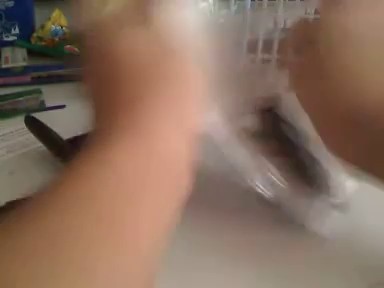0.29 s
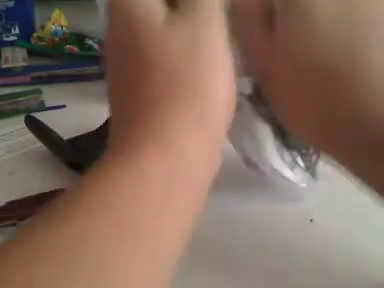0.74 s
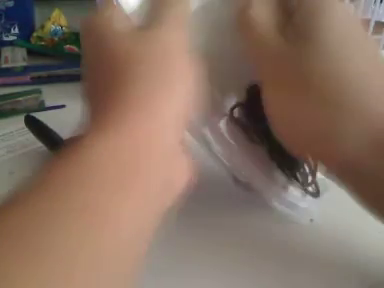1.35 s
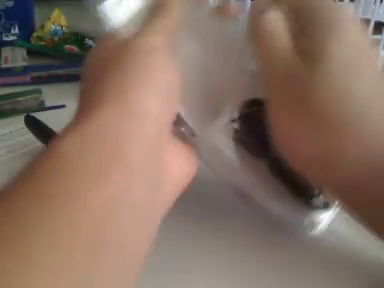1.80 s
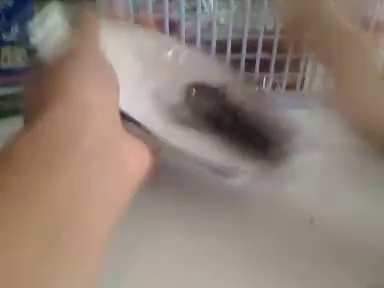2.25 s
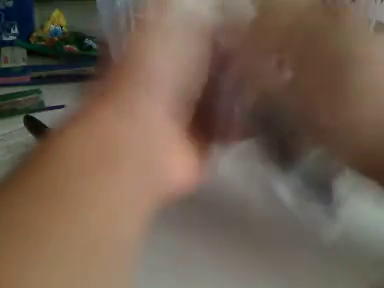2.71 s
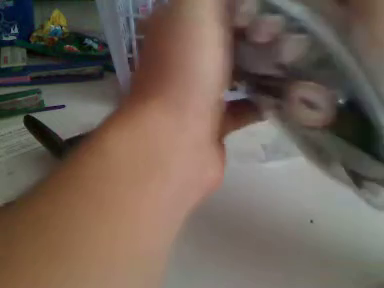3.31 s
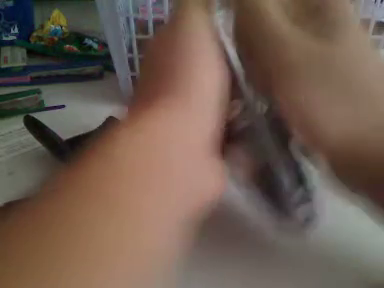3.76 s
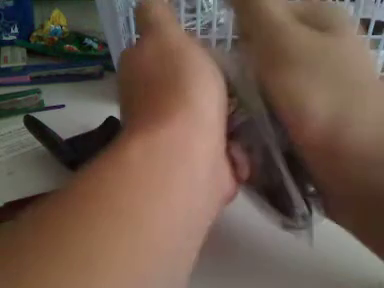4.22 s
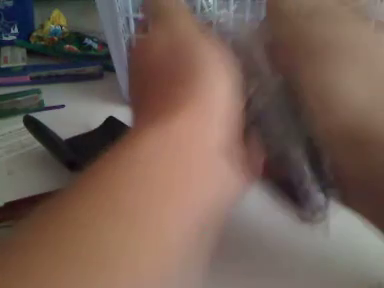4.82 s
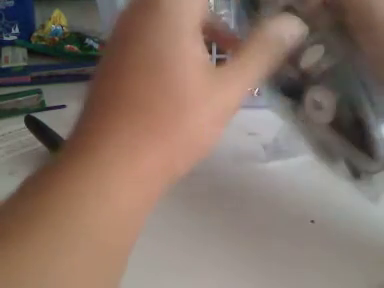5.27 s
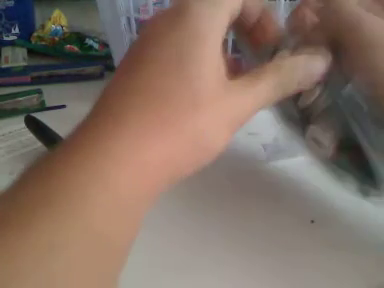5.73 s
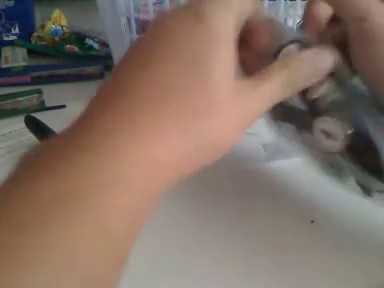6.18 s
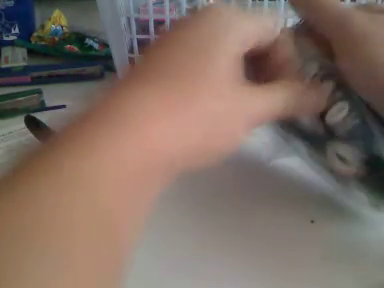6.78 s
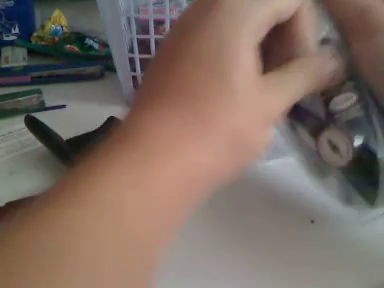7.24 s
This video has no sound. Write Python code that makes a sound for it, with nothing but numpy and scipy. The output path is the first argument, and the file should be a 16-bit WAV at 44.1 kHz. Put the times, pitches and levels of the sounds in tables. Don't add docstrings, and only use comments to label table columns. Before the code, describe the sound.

Stiff clear plastic packaging buckles, crackles and snaps in hands close to a dull microphone, with two booming cracks among many small dry pops.

```python
import sys
import numpy as np
from scipy import signal
from scipy.fft import rfft, irfft
from scipy.io import wavfile

SR = 44100
rng = np.random.default_rng(int(sys.argv[2]) if len(sys.argv) > 2 else 0)


def boost_factor(decibels):
    exponent = np.asarray(decibels, float) / 20
    return 10 ** exponent


def generate_wav(signal):
    frames = np.transpose(np.atleast_2d(signal))
    scaled = np.clip(frames, -1, 1) * 32767
    pcm = np.round(scaled).astype(np.int16)
    wavfile.write(sys.argv[1], SR, pcm)


N = 326369

# (time [s], peak [dB],
# panel pitch [Hz], crack over panel [dB], shudder over panel [dB])
HOLLOW_SNAPS = [(0.202, -31.5, 910, -13, -28), (0.2797, -11, 934, -4.5, -15), (0.561, -16, 1050, -6, -15),
                (0.822, -17.5, 865, 3, -26.5), (1.0931, -24, 2500, 3, -37), (1.74, -19, 830, -11.5, -23.5),
                (2.757, -27.5, 970, -1.5, -16.5), (2.868, -27, 817, 0.5, -23),
                (2.929, -25, 830, -0.5, -24.5), (3.028, -34, 868, -6.5, -14.5), (4.234, -29, 980, -3, -24)]
SHELL_SNAPS = [(1.798, -22.5, 1175, -0.5, -15), (2.269, -10.5, 715, -7.5, -5), (3.391, -31, 817, -0.5, -24),
               (3.983, -28, 815, -6, -10.5), (4.526, -25, 556, -1.5, -16.5), (4.643, -19.5, 559, 0.5, -16),
               (5.175, -31, 1010, 1, -17), (5.229, -24.5, 532, -28, -9), (5.644, -29.5, 795, -8, -19),
               (6.055, -24, 665, -4, -30), (6.336, -26.5, 860, -17, -12), (6.427, -31.5, 632, -7, -10),
               (6.737, -23.5, 780, -4, -17), (6.81, -28, 392, -4.5, -13), (7.097, -12.5, 617, -1.5, -6.5),
               (7.32, -18, 785, -13.5, -40)]
# (time [s], peak [dB], panel pitch [Hz], shudder over panel [dB])
NEIGHBOURS = [(.277, -22.5, 800, -14), (.279, -22, 1030, -5.5), (0.564, -22, 1000, -10.5),
              (1.739, -28.5, 510, -6), (1.799, -27.5, 1728, -12.5), (2.27, -17.5, 1200, -1.5),
              (2.2684, -17.5, 3630, -25), (4.5258, -33, 1680, -15), (4.526, -39, 996, -21),
              (5.229, -33, 1080, -12), (5.229, -22.5, 1805, -7), (5.231, -35, 2330, -13),
              (5.301, -52, 1500, -20), (7.098, -17, 1630, -10), (6.335, -30, 510, -13),
              (6.739, -43.5, 2280, -5.5), (7.096, -19, 1740, -6), (7.096, -18, 930, -21),
              (7.32, -39, 2234, -21)]
# (time [s], modes [(pitch [Hz], level [dB], fall by 60 dB [s])])
FLIPS = [(.2778, [(419, -20.5, 0.042), (827, -3, 0.012), (1034, -3, 0.012), (1450, -18, 0.025),
         (2670, -25.5, 0.008), (3600, -28, 0.019)]), (.561, [(443, -17.5, 0.031), (1107, -33, 0.018),
         (3330, -19.5, 0.007)]), (1.74, [(395, -14.5, 0.0088), (826, -18.5, 0.039), (1500, -23.5, 0.019)]),
         (1.798, [(1130, -9.5, 0.025), (1600, -9.5, 0.016), (1990, -37, 0.016), (3270, -12.5, 0.0059)]),
         (2.269, [(203, -10, 0.024), (482, -9, 0.017), (727.5, 5, 0.02), (1172, -16, 0.089),
         (1468, -2.5, 0.023), (1803, -12.5, 0.048), (2164, -11.5, .02), (2980, -7.5, 0.017),
         (3405, -8, 0.014)]), (4.526, [(594, -24.5, .025), (999, -20.5, 0.012), (1476, -24, 0.014),
         (2395, -25, 0.0094)]), (4.642, [(510, -29, 0.038), (1500, -36.5, 0.014), (2500, -25.5, 0.01)]),
         (5.228, [(536, -12.5, 0.019), (1070, -16.5, 0.018), (1656, -21.5, 0.021), (1850, -22.5, 0.018),
         (2530, -29.5, 0.011), (3753, -28.5, 0.0095)]), (6.335, [(523, -33.5, 0.042), (879, -23.5, 0.04),
         (2160, -32.5, 0.017)]), (6.738, [(765, -22.5, 0.012), (1500, -31, 0.0045), (2400, -20, 0.0072)]),
         (6.8097, [(476, -18, 0.013), (1610, -24.5, 0.013), (3430, -40.5, .012)]),
         (7.0964, [(200, -17, 0.03), (640, -2.5, 0.027), (867, 1.5, 0.013), (1682, -10.5, 0.034),
         (2098, -3.5, 0.011), (3100, -13.5, 0.028), (3623, -3.5, 0.0097)]), (7.32, [(803, -19, 0.024),
         (1020, -18.5, 0.015), (1440, -27.5, 0.027), (1710, -28, 0.022), (2430, -24.5, 0.017),
         (3460, -21, 0.014)])]
# (time [s], peak [dB], panel pitch [Hz], crack over
# panel [dB])
HOLLOW_TICKS = [(0.031, -38.5, 810, -1), (0.135, -49, 468, 2), (6.801, -37.5, 850, -12),
                (0.388, -34, 500, -6), (0.443, -35.5, 820, -11), (0.465, -36.5, 800, -9),
                (0.609, -30.5, 870, -10.5), (0.73, -35, 790, -6.5), (0.779, -43.5, 870, -24),
                (0.879, -39, 860, -30), (0.915, -26, 870, -3.5), (1.053, -37.5, 860, -5),
                (1.154, -36, 1240, -19), (1.237, -35, 785, -7.5), (1.0897, -33, 1000, -8),
                (1.508, -36, 317, -33), (1.572, -36.5, 790, -41.5), (1.674, -34, 740, -34),
                (1.913, -34.5, 790, -35.5), (1.985, -44.5, 1190, -41), (2.057, -34, 810, -66),
                (2.089, -37, 460, -45), (2.515, -37, 890, -19)]
SHELL_TICKS = [(2.729, -39.5, 966, 12.5), (2.803, -32.5, 1210, -8), (2.959, -42.5, 816, -5),
               (3.049, -33.5, 830, -29), (3.249, -37, 1270, -7), (3.286, -36.5, 404, -9),
               (3.347, -37, 855, -13), (3.45, -32.5, 1560, -1), (3.479, -31.5, 877, -5),
               (3.577, -38, 490, -7.5), (3.694, -38, 516, -10), (3.762, -39, 864, -38.5),
               (4.38, -35, 603, -2.5), (4.486, -30, 470, -5), (4.898, -38.5, 1540, -6),
               (5.106, -38.5, 493, -2), (5.565, -31.5, 610, -18.5), (5.609, -30, 820, -3),
               (5.75, -37, 570, -8), (5.789, -33.5, 593, -14), (5.844, -27.5, 1660, -5),
               (5.962, -29.5, 613, -21), (5.996, -36.5, 659, 0.5), (6.1, -30, 600, -36),
               (6.169, -38.5, 855, -27), (6.485, -36, 666, -24), (6.52, -35, 1580, -26),
               (3.658, -49.5, 1500, -13), (6.997, -33.5, 895, -8), (7.027, -32.5, 493, -7.5)]
CREASES = [(0.046, -46.5, 730, -9), (.066, -41.5, 1220, -27.5), (0.154, -54, 447, -1),
           (.215, -41, 1073, -15.5), (0.652, -44, 781, -7), (.988, -40, 880, -1), (1.02, -44, 1030, -38),
           (1.115, -35, 1320, -32), (1.213, -39, 1540, -21), (1.654, -38, 796, -34),
           (2.075, -39, 760, -59.5), (2.114, -46, 700, -65.5), (2.744, -34, 850, -9.5),
           (2.829, -33.5, 1500, 9.5), (3.519, -45, 510, -21), (3.606, -40, 594, -34), (3.845, -39, 760, 7),
           (3.93, -38.5, 866, -17), (4.003, -32, 1060, -13), (4.045, -36.5, 1083, -37),
           (4.211, -35, 760, -11), (4.254, -35, 1070, -4.5), (4.768, -44, 1410, -8),
           (4.964, -48, 475, -20.5), (5.316, -34.5, 860, -15), (5.416, -36, 1010, -6),
           (5.469, -39, 867, -26), (5.664, -34.5, 550, -29), (5.814, -35, 624, -31),
           (6.378, -48, 520, -12.5)]
MORE_CREASES = [(.774, -45, 859, -4), (1.176, -40.5, 1260, -19), (1.598, -41, 817, -34), (1.638, -40, 650, -26),
                (1.701, -41, 724, -15), (1.732, -34.5, 790, -27), (1.967, -49, 1200, -25),
                (2.028, -37.5, 830, -34), (2.105, -64, 780, -31), (2.244, -44.5, 1396, -13.5),
                (2.984, -46.5, 852, -12.5), (3.299, -50, 506, -11), (3.314, -41, 1210, 9.5),
                (3.354, -34.5, 484, -4), (3.414, -39.5, 796, -15), (3.827, -44, 2220, -12.5),
                (3.857, -40, 874, -8), (3.914, -43, 2070, -4), (3.973, -36, 880, -22.5), (4.089, -44, 478, -3),
                (4.497, -41, 450, -8.5), (4.579, -43, 562, -22), (4.714, -38.5, 516, -19),
                (3.497, -42, 500, -11), (4.784, -45, 680, -3), (4.797, -45.5, 1460, -14),
                (4.814, -43.5, 1500, -2.5), (4.851, -45.5, 2300, -5), (2.449, -39.5, 340, -19),
                (4.916, -41.5, 1630, -9.5), (5.119, -40.5, 546, -7), (5.14, -45, 2400, 2),
                (5.167, -34.5, 550, -5.5), (5.199, -33.5, 511, -3), (5.269, -41, 1780, -18),
                (5.279, -39, 570, -21), (5.308, -35.5, 2030, -2.5), (5.434, -39.5, 750, -9),
                (5.482, -40.5, 800, -14), (5.837, -36, 1600, -7), (5.974, -35, 663, -13), (6.135, -37, 865, -1),
                (6.348, -36.5, 894, -12), (6.392, -37.5, 659, -13), (6.727, -35.5, 746, -14.5),
                (6.764, -36.5, 800, -6), (6.794, -32.5, 855, -10), (6.949, -40, 646, -8)]
# (time [s], length [s], level [dB], panel pitch [Hz], crack over panel [dB])
FOLDS = [(0.243, 0.02, -28, 426, -35), (0.529, 0.059, -30, 800, -39), (0.811, 0.016, -31, 1000, -5),
         (0.858, 0.075, -30.5, 1050, -7), (1.094, 0.043, -33.5, 1080, -10), (1.45, 0.18, -40, 330, -45.5),
         (1.992, 0.023, -36, 965, -46), (2.738, 0.1, -43, 950, 0), (2.884, 0.025, -41, 3560, -1),
         (2.927, 0.048, -49, 900, 11), (3.913, 0.043, -40, 670, -8), (3.937, 0.081, -42.5, 784, -24),
         (4.179, 0.064, -47, 980, -1), (5.223, 0.095, -40.5, 1580, -6), (5.717, 0.18, -41, 550, -11),
         (5.924, 0.074, -48.5, 745, 8.5), (6.051, 0.015, -23.5, 930, -5), (6.067, 0.072, -33, 584, -3),
         (6.465, 0.041, -37.5, 870, -0.5), (6.785, 0.064, -39.5, 614, -32.5),
         (7.337, 0.032, -51.5, 470, -18.5)]
SHIFTS = [
    (0, 0.028, -57.5, 885, 12),
    (1.33, 0.078, -41, 208, -39),
    (1.892, 0.19, -39, 700, -46),
    (2.358, 0.18, -45, 700, -6.5),
    (2.502, 0.051, -51.5, 1300, 2.5),
    (3.108, 0.16, -47, 780, -3),
    (4.714, 0.12, -50.5, 538, 4),
    (6.855, 0.24, -44.5, 700, -1.5),
]
FURTHER_RUNS = [(0.753, 0.053, -40, 840, -5), (1.146, 0.047, -39.5, 1200, -6), (1.219, 0.061, -44, 448, -11),
                (1.467, 0.083, -37.5, 820, -35), (1.557, 0.23, -43.5, 780, -19), (1.796, 0.067, -36, 1170, -31),
                (1.828, 0.11, -49.5, 1670, -16), (1.914, 0.031, -40, 940, -26), (1.936, 0.089, -42, 326, -37),
                (2.866, 0.025, -32, 3600, -7.5), (3.276, 0.038, -36.5, 780, -7), (3.34, 0.043, -46, 800, 1),
                (3.833, 0.16, -43.5, 530, -15), (4.085, 0.026, -48.5, 504, -2.5),
                (4.529, 0.076, -46, 1690, -22.5), (4.966, 0.029, -53.5, 700, 6), (5.168, 0.061, -38, 617, -2.5),
                (5.389, 0.058, -42.5, 945, -18), (5.433, 0.069, -38.5, 773, -9), (5.492, 0.07, -40.5, 726, -6),
                (5.559, 0.026, -36, 646, -12), (5.633, 0.031, -27.5, 820, -6), (5.937, 0.055, -40, 650, -21),
                (6.027, .025, -38, 800, -8), (6.131, 0.059, -44.5, 800, -3.5), (6.301, 0.034, -42, 796, -17),
                (6.344, 0.16, -47, 870, -10), (6.741, 0.027, -41.5, 810, -3), (6.845, 0.033, -37, 700, -0.5),
                (7.16, 0.17, -41, 510, -5.5), (7.312, 0.071, -35.5, 490, -2), (7.379, 0.027, -40.5, 420, -17)]
# (time [s], pitch [Hz], level [dB], fall by 60 dB [s])
SHELL_RINGS = [
    (.279, 797, -29, 0.044),
    (1.8, 1200, -49, 0.096),
    (1.8, 1548, -43, 0.086),
    (2.272, 710, -27.5, .27),
    (2.272, 762.5, -34.5, 0.31),
    (7.1, 702, -32.5, 0.18),
    (7.1, 561, -31.5, 0.23),
]
# (time [s], squeeze [dB], tautness as sheet over body [dB])
CRUMPLE = [
    (0.0, -64, 2),
    (1.96, -60, 3),
    (2.06, -63, 2),
    (6.86, -60.5, 1.5),
    (7.4, -53.5, -1.5),
]
# (pitch [Hz], width [Hz], level [dB])
BODY = [(468, 40, 6.5), (640, 29, -1), (820, 77, 3), (1050, 170, -3.5)]
# (frequency [Hz], level [dB])
SHEET = [(710, -39.5), (1200, -24), (1300, 7), (2010, 1.5), (2160, -0.5), (3600, 0), (4400, -9),
         (5720, -56.5), (9680, -120)]
# (pitch [Hz], width [Hz], level [dB])
RIDGES = [(1545, 170, 1), (2500, 320, -15), (3170, 530, -17.5)]
# (frequency [Hz], fall by 60 dB [s])
SHUDDER = [(300, 0.052), (700, 0.22), (1500, 0.054), (4000, 0.38)]
# (time [s], peak [dB])
THUDS = [(0.561, -40.5), (0.819, -43.5), (1.797, -45), (2.268, -24.5), (2.778, -49), (2.865, -48),
         (3.985, -48.5), (4.639, -48.5), (5.224, -49.5), (5.799, -57), (6.44, -51.5), (6.81, -42.5),
         (7.094, -31.5), (7.317, -46.5)]
# (time [s], level [dB])
LEAN = [
    (0.0, -69.5),
    (.9, -69),
    (1.3, -70.5),
    (2.2, -72.5),
    (2.4, -64),
    (2.95, -66.5),
    (3.15, -72),
    (6.2, -71),
    (6.82, -69.5),
    (7.4, -67),
]
# (frequency [Hz], fall by 60 dB [s], level [dB])
ROOM = [(100, 0.29, -15.5), (291.6, 0.19, -18.5), (700, 0.24, -20), (1500, 0.36, -23.5), (2500, .14, -16.5),
        (4180, 0.097, -18)]
# (frequency [Hz], level [dB])
HUSH = [(12, -33.5), (20, 7.5), (49, 11.5), (195, -15.5), (471, -4), (828, -10), (1190, -5), (3510, -12.5),
        (4020, -21), (4400, -6), (5720, -42), (9680, -120)]

HOLLOW_BOOM_DB, SHELL_BOOM_DB = -7, -20.5
SNAP_WIDTH_HZ = 115
FLIP_RISE_CYCLES = 0.89
BODY_DB, SHEET_DB = -4.5, -11.5
RUB_DB, RUB_FOLLOWS = -65, 0.29
SHEET_FOLLOWS_CRACK = 0.28
SETTLE_S, LEAD_S = 0.031, 0.0093
SETTLE_FOLLOWS, TYPICAL_DB = 0.22, -33
REST_DB = -2
RUMBLE_DB, RUMBLE_SWAY_DB = 1.5, 1
ECHO_S, ECHO_DB = 0.0102, -18
BAND_EDGE_HZ, OVERLOAD = 4886, 0.72


def snaps():
    rows = []
    for table, boom_db in ((HOLLOW_SNAPS, HOLLOW_BOOM_DB), (SHELL_SNAPS, SHELL_BOOM_DB)):
        rows += [(s, db, hz, crack_db, boom_db, shudder_db) for s, db, hz, crack_db, shudder_db in table]
    rows += [(s, db, hz, -30, -30, shudder_db) for s, db, hz, shudder_db in NEIGHBOURS]
    return buckle(rows, rip_s=0.003, rise_s=0.00041, trim_db=(-1.1, 4, 4), size=10240)


def flips():
    out = np.zeros(N + SR // 10)
    t = np.arange(SR // 10) / SR
    for s, modes in FLIPS:
        hz, db, t60 = np.transpose(modes)[:, :, None]
        rise = np.minimum(t * hz / FLIP_RISE_CYCLES, 1)
        ringing = boost_factor(db - 60 * t / t60) * np.sin(2 * np.pi * hz * t) * rise
        out[round(s * SR):][:len(t)] += np.sum(ringing, axis=0)
    return out[:N]


def ticks():
    pops = HOLLOW_TICKS + SHELL_TICKS + CREASES + MORE_CREASES
    rows = [(s, db, hz, crack_db, -14, -21) for s, db, hz, crack_db in pops]
    return buckle(rows, rip_s=0.002, rise_s=0.0005, trim_db=(-3, 5, 0.1), size=5120)


def buckle(rows, rip_s, rise_s, trim_db, size):
    out = np.zeros(N + size)
    t = np.arange(size) / SR
    s, peak_db, panel_hz, crack_db, boom_db, shudder_db = np.transpose(rows)[:, :, None]
    level_trim, crack_trim, boom_trim = trim_db
    colour = crack_db + crack_trim, boom_db + boom_trim
    white = rng.standard_normal((len(rows), 2, size))
    rip = white[:, 0] * np.exp(-t / rip_s) * np.minimum(t / rise_s, 1)
    crack = peak_one(voice(rip, panel_hz, SNAP_WIDTH_HZ, *colour))

    shudder = voice(white[:, 1], panel_hz, 3.1 * SNAP_WIDTH_HZ, *colour) * np.minimum(t / 0.003, 1)
    treble = band(shudder, 450, 6000)
    dying = (shudder - treble) * boost_factor(-60 * t / at_hz(SHUDDER, panel_hz))
    dying = dying + 0.45 * treble * boost_factor(-60 * t / at_hz(SHUDDER, 2500))
    sounds = boost_factor(peak_db + level_trim) * (crack + boost_factor(shudder_db) * dying)
    starts = np.round(s.ravel() * SR).astype(int) - 30
    for at, sound in zip(starts, sounds):
        out[at:at + size] += sound
    return out[:N]


def voice(rips, panel_hz, width_hz, crack_db, boom_db):
    panel = []
    for rip, hz in zip(rips, np.ravel(panel_hz)):
        modes = resonate(rip, hz, width_hz) + 0.13 * resonate(rip, 1.9 * hz, width_hz)
        panel.append(resonate(modes, hz, 1.5 * hz))
    bright = resonances(rips, RIDGES) + 1.7 * band(rips, 920, 3100)
    boom = band(band(rips, 170, 800), 165, 900)
    return rms_one(np.array(panel)) + boost_factor(crack_db) * rms_one(bright) + boost_factor(boom_db) * rms_one(boom)


def runs():
    out = np.zeros(N + SR)
    cracks = np.r_[grains(per_s=3500, spread_db=3.5, clump_db=2.5), rng.standard_normal(SR)]
    for s, length_s, db, panel_hz, crack_db in FOLDS + SHIFTS + FURTHER_RUNS:
        at, size = round(s * SR), round(length_s * SR)
        swell = np.r_[np.sqrt(np.hanning(size)), np.zeros(size)]
        packed = cracks[None, at:at + 2 * size] * swell
        out[at:at + 2 * size] += boost_factor(db - 18.5) * voice(packed, panel_hz, 210, crack_db, -15.5)[0]
    return out[:N]


def rings():
    out = np.zeros(N + SR // 2)
    t = np.arange(SR // 2) / SR
    for s, hz, db, t60 in SHELL_RINGS:
        at = round(s * SR)
        out[at:at + len(t)] += boost_factor(db - 60 * t / t60) * np.sin(2 * np.pi * hz * t) * np.minimum(t / 0.0099, 1)
    return out[:N]


def crumple():
    effort_db, taut_db = in_time(CRUMPLE)
    sheet_db = effort_db + settling(SHEET_FOLLOWS_CRACK) + SHEET_DB + taut_db
    squeeze_db = effort_db + settling(0)
    rub_db = RUB_DB + RUB_FOLLOWS * (squeeze_db - squeeze_db.mean() - taut_db)
    cracks = grains(per_s=500, spread_db=4.5, clump_db=1.5)
    fine = grains(per_s=2000, spread_db=4, clump_db=1.5)
    body = boost_factor(squeeze_db + BODY_DB - taut_db) * rms_one(resonances(cracks, BODY))
    sheet = boost_factor(sheet_db) * shaped(cracks + fine, SHEET)
    rub = band(rng.standard_normal(N) * boost_factor(2 * drift(25.0)), 80, 530)
    return body + sheet + boost_factor(rub_db) * rms_one(rub)


def settling(crack_share):
    kicks = np.zeros(N + SR)
    t = np.arange(SR) / SR / SETTLE_S
    for s, db, hz, crack_db, *_ in HOLLOW_SNAPS + SHELL_SNAPS + HOLLOW_TICKS + SHELL_TICKS + CREASES:
        kicks[round(s * SR)] = boost_factor(SETTLE_FOLLOWS * (db - TYPICAL_DB) + crack_share * (crack_db + 10.5))
    swells = signal.fftconvolve(kicks, t * np.exp(1 - t))
    busy = np.abs(swells[round(LEAD_S * SR):][:N])
    return 20 * np.log10(boost_factor(REST_DB) + busy)


def rumble():
    knocks = np.zeros(N)
    for s, db in THUDS:
        knocks[round(s * SR)] = boost_factor(db + 44.5)
    thuds = band(band(knocks, 22, 200), 20, 180)
    level_db = RUMBLE_DB + in_time(LEAN)[0] + RUMBLE_SWAY_DB * drift(4.0)
    return boost_factor(level_db) * rms_one(band(rng.standard_normal(N), 25, 100)) + thuds


def room(x):
    t = np.arange(SR // 2) / SR
    edges = 60 * 2 ** np.arange(0, 6.6, 0.5)
    white = rng.standard_normal((2, len(t)))
    reply = np.zeros(len(t))
    for k, (low, high) in enumerate(zip(edges, edges[1:])):
        hz = np.sqrt(low * high)
        dying = white[k % 2] * boost_factor(-60 * t / at_hz(ROOM, hz)) * np.minimum(t / 0.013, 1)
        dying = dying / np.sqrt(np.sum(dying ** 2))
        reply += boost_factor(at_hz(ROOM, hz, axis=2)) * band(dying, low, high)
    reply[round(ECHO_S * SR)] += boost_factor(ECHO_DB)
    return signal.fftconvolve(x, reply)[:N]


def hush():
    return boost_factor(-70) * shaped(rng.standard_normal(N), HUSH)


def grains(per_s, spread_db, clump_db):
    born = rng.random(N) < per_s * boost_factor(clump_db * drift(25.0)) / SR
    size = boost_factor(spread_db * np.minimum(rng.exponential(1, N), 4))
    return born * size * rng.choice([-1, 1], N) + 1e-9


def drift(rate_hz):
    r = np.exp(-2 * np.pi * rate_hz / SR)
    wander = signal.lfilter([1], [1, -2 * r, r * r], rng.standard_normal(N + SR))
    return rms_one(wander[SR:])


def resonate(x, hz, width_hz):
    r = np.exp(-np.pi * width_hz / SR)
    poles = [1, -2 * r * np.cos(2 * np.pi * hz / SR), r * r]
    return signal.lfilter([(1 - r * r) / 2, 0, (r * r - 1) / 2], poles, x)


def resonances(x, modes):
    return sum((-1) ** k * boost_factor(db) * resonate(x, hz, width_hz) for k, (hz, width_hz, db) in enumerate(modes))


def band(x, low_hz, high_hz):
    return signal.sosfilt(signal.butter(2, [low_hz, high_hz], "band", fs=SR, output="sos"), x)


def shaped(x, spectrum):
    gain = boost_factor(at_hz(spectrum, np.linspace(0, SR / 2, N // 2 + 1)))
    return rms_one(irfft(rfft(x) * gain, N))


def at_hz(points, hz, axis=1):
    points = np.array(points)
    return np.interp(np.log(hz + 1), np.log(points[:, 0]), points[:, axis])


def in_time(rows):
    s, *columns = np.transpose(rows)
    return [np.interp(np.arange(N) / SR, s, c) for c in columns]


def rms_one(x):
    return x / np.sqrt(np.mean(x ** 2, axis=-1, keepdims=True) + 1e-20)


def peak_one(x):
    return x / np.max(np.abs(x), axis=-1, keepdims=True)


def scene():
    hits = snaps() + flips() + ticks() + runs() + rings()
    return (hits + room(hits) + crumple() + rumble() + hush())[None]


def top_cut(x):
    return signal.sosfilt(signal.butter(12, 16600, fs=SR, output="sos"), x)


def record(dry):
    narrow = signal.sosfiltfilt(signal.cheby2(8, 38, BAND_EDGE_HZ, fs=SR, output="sos"), dry)
    clipped = np.clip(narrow, -OVERLOAD, OVERLOAD)
    smooth = signal.sosfilt(signal.butter(6, 15600, fs=SR, output="sos"), clipped)
    mix = smooth * np.minimum(np.arange(N, 0, -1) / 90, 1)
    return top_cut(mix)


dry = scene()
out = record(dry)
generate_wav(out)
```